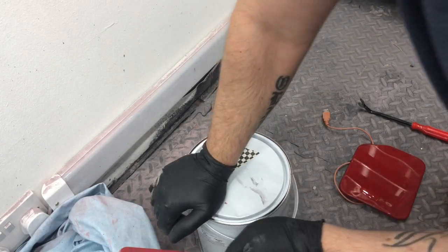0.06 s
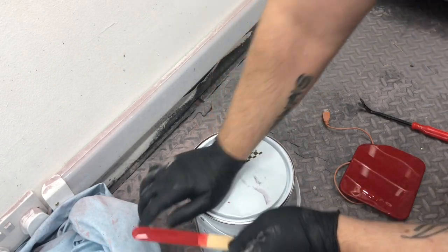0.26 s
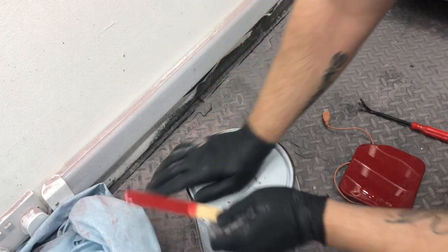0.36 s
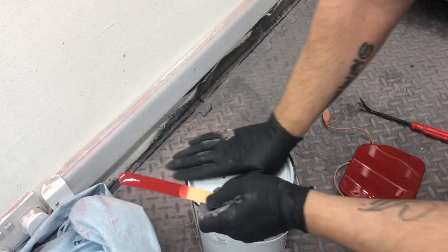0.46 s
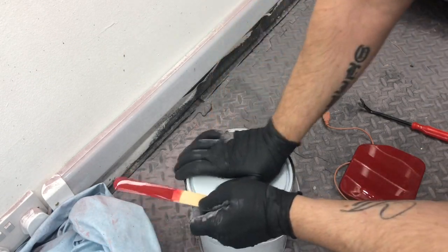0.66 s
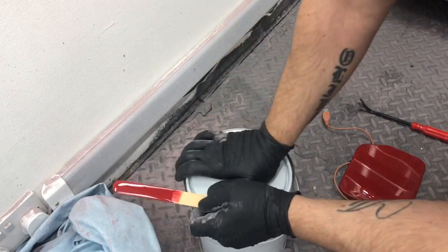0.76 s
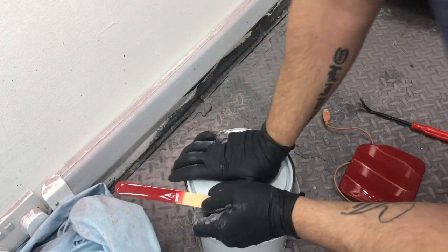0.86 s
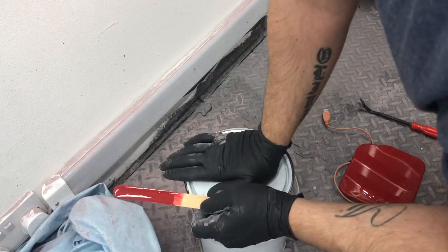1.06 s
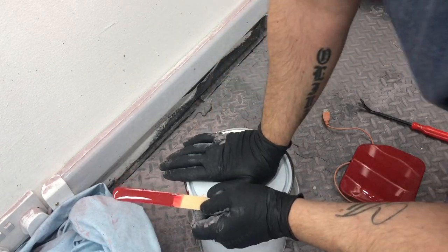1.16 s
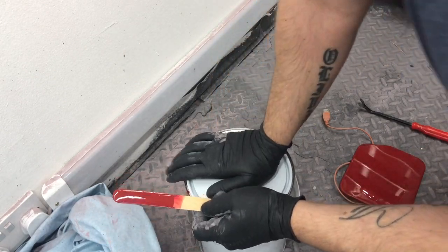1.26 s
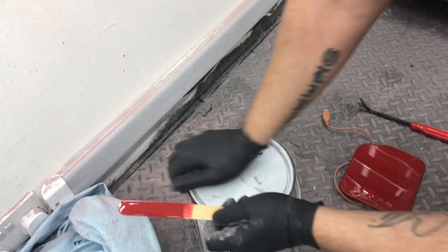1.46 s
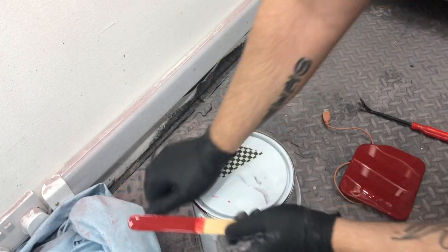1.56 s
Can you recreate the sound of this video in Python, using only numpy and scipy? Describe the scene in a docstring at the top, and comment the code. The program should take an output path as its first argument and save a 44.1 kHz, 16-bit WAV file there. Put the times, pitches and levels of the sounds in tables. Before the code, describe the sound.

Metal paint tin lid struck shut by hand, hollow clank, rubbing and bright seam clicks in a garage

```python
"""A gloved hand knocks the lid of a paint tin down in a garage: one hard blow, two soft pushes, a last firm knock.
Each blow excites damped modes of the tin, a bending wave of falling pitch and a rattle of the sheet.
The seam snaps as noise bursts over hollow pops, and light taps ring as the lid shifts under the glove.
The sliding glove is shaped noise with a rim resonance and a drone; faint squeaks are gliding sines.
Shaped noise and one faint tone fill the room; decaying noise gives the echoes."""
import sys
import numpy as np
from scipy import signal
from scipy.fft import rfft, irfft
from scipy.io import wavfile

SR = 44100
rng = np.random.default_rng(int(sys.argv[2]) if len(sys.argv) > 2 else 0)


def persist_wave(psi):
    """Save psi, clipped to +-1, as 16-bit WAV."""
    counts = np.round(np.clip(psi, -1, 1) * 32767).astype(np.int16)
    wavfile.write(sys.argv[1], SR, np.atleast_2d(counts).T)


def gain_from_db(level_db):
    """Turn a decibel level (scalar or array-like) into a linear amplitude factor."""
    decades = np.asarray(level_db, float) / 20
    return 10 ** decades


N = 72765  # length [samples]


def in_time(rows):
    """Linear interpolation: turns each column after the time into a curve over the scene."""
    s, *columns = np.transpose(rows)
    return [np.interp(np.arange(N) / SR, s, column) for column in columns]


def at_hz(points, hz):
    """Interpolation on a logarithmic frequency axis."""
    table_hz, values = np.array(points).T[:2]
    return np.interp(np.log(hz), np.log(table_hz), values)


def rms_one(x):
    """Normalisation to unit effective value."""
    return x / np.sqrt(np.mean(x ** 2) + 1e-20)


def coloured(spectrum):
    """Spectral shaping: white noise weighted by a spectrum, rms 1."""
    hz = np.maximum(np.arange(N // 2 + 1) * SR / N, 1)
    white = rng.standard_normal(N)
    return rms_one(irfft(rfft(white) * gain_from_db(at_hz(spectrum, hz)), N))


def decay(t, t60, level_db=0):
    """Exponential damping: the level falls by 60 dB in each t60 [s]."""
    return gain_from_db(level_db - 60 * t / t60)


def ring(hz, t60, length):
    """Damped resonance: a sine that builds up over about a cycle, so low modes swell later."""
    build_cycles = 0.24  # time constant
    t = np.arange(length) / SR
    return np.sin(2 * np.pi * hz * t) * decay(t, t60) * (1 - np.exp(-t * hz / build_cycles))


def phase(hz):
    """Instantaneous phase [rad]: the running integral of frequency."""
    return 2 * np.pi * np.cumsum(hz) / SR


def soften(x, cut_hz):
    """Contact compliance: a soft contact acts as a second-order low-pass."""
    return signal.sosfilt(signal.butter(2, min(cut_hz, .45 * SR), fs=SR, output="sos"), x)


def add(out, s, sound):
    """Superposition: mixes a sound in at a time [s]."""
    i = int(s * SR)
    out[i:i + len(sound)] += sound[:N - i]


# background noise of the room: (frequency [Hz], relative level [dB per Hz])
ROOM_SPECTRUM = [(20, -57), (30, -47), (42, -6), (60, 1), (90, -7.5), (370, -16.5), (680, -18), (940, -14),
                 (1500, -20), (2350, -28.5), (3430, -33), (7900, -44), (16000, -55)]
# faint tone that swells, then sinks to a steady level: (time [s], frequency [Hz], peak level [dB])
FAINT_TONE = [(1.1, 375, -87), (1.14, 368.3, -56.5), (1.23, 374, -57.5), (1.28, 359, -64)]


def room_tone():
    """Stationary broadband noise plus one frequency-modulated sine."""
    hz, db = in_time(FAINT_TONE)
    noise = gain_from_db(-52) * coloured(ROOM_SPECTRUM)
    return noise + gain_from_db(db) * np.sin(phase(hz))


# glove sliding over the lid: (time [s], rms level [dB])
SLIDE_LEVEL = [(0, -79), (.26, -71.5), (.285, -53), (.34, -74), (.41, -77), (.42, -59.5), (.47, -58),
               (.5, -60), (.58, -60), (.63, -55.5), (.72, -52.5), (.78, -58), (.86, -60.5), (.92, -68.5),
               (1.2, -68.5), (1.4, -63.5), (1.43, -59), (1.48, -55.5), (1.505, -69), (1.65, -65.5)]
# colour of the glove's rustle: (frequency [Hz], relative level [dB per Hz])
RUSTLE_SPECTRUM = [(1470, -10), (2500, -4), (3490, -4.5), (3860, -3), (5830, -7), (6550, -8.5),
                   (15000, -10.5), (16000, -9.5)]
# the rim singing while it is rubbed: (time [s], rms level [dB], centre frequency [Hz])
RIM_SONG = [(0, -99, 3900), (.412, -85, 3900), (.42, -57.5, 3900), (.447, -54.5, 3900), (.455, -69, 4700),
            (.467, -56, 4750), (.478, -68, 4680), (.505, -69, 4427), (.515, -69, 4480), (.565, -63, 4390),
            (.575, -76, 4060), (.585, -52, 3966), (.65, -67, 3830), (.72, -76, 3706), (1.52, -71.5, 3813),
            (1.57, -65, 4140), (1.65, -67, 3870)]
# the lid body droning under the same rubbing: (time [s], rms level [dB])
DRAG_LEVEL = [(0, -90), (.4, -101), (.43, -47), (.47, -53), (.5, -62), (.56, -54.5), (.575, -41.5),
              (.62, -52), (.7, -58.5), (.8, -58.5), (1.65, -62)]
# colour of the drone: (frequency [Hz], relative level [dB per Hz])
DRAG_SPECTRUM = [(120, -10), (200, 0), (352, 3), (524, -29), (594, -15), (753, -4.5), (1130, -12),
                 (1540, -2.5), (3000, -18), (3900, -42), (6600, -120)]


def rubbing():
    """Friction noise: smooth rustle, with a wandering rim resonance and a lid drone in common grain."""
    slide_db, = in_time(SLIDE_LEVEL)
    rim_db, rim_hz = in_time(RIM_SONG)
    drag_db, = in_time(DRAG_LEVEL)
    grain = gain_from_db(2.8 * rms_one(soften(rng.standard_normal(N), 120)))  # 2.8 dB rms, up to about 120 Hz
    rim_width_hz = 430  # before the grain
    wobble = rms_one(soften(rng.standard_normal(N), rim_width_hz / 2))
    band = wobble * np.sqrt(2) * np.sin(phase(rim_hz))
    rustle = gain_from_db(slide_db) * coloured(RUSTLE_SPECTRUM)
    rim = gain_from_db(rim_db) * rms_one(grain * band)
    drone = gain_from_db(drag_db) * rms_one(grain * coloured(DRAG_SPECTRUM))
    return rustle + rim + drone


# blows of the hand: (time [s], level [dB], contact cut-off of each of two low-passes [Hz],
# spot on the lid [whole part: 0, 1 or 2])
HAND_BLOWS = [(0.2194, -16, 5000, 0), (.822, -51, 500, 0), (0.8529, -34, 1490, 1),
              (1.3865, -23.5, 2100, 2.047)]
# modes of the tin: (frequency [Hz])
MODE_HZ = [118, 176, 245, 267, 315, 420, 535, 590, 633, 695, 772, 902, 1020, 1060, 1126, 1192, 1270, 1392,
           1642, 1867, 2205, 2754]
# for each mode: (t60 before the spot's share [s], relative level when struck at spot 0, 1, 2 [dB])
MODES = [(0.15, -11, 10, -7), (.1, 0.5, 18, 4), (0.13, -0.5, -5, 2.5), (0.3, -3, -7, -32),
         (0.17, -8, 6.5, -9), (0.22, -8.5, -3, 6.5), (.11, 7.5, 2, 0), (0.067, -16, 2, -10),
         (0.19, 1, -5, -6.5), (0.098, 3, -7, 7.5), (0.14, -0.5, -4, -6.5), (0.13, -23, -16, -27),
         (0.19, -3, -27, -8), (0.1, 1, -28, -11), (0.13, -4, -34, -7), (.09, -13, -34, -32),
         (0.17, -3, -34, -32), (0.18, -12, -30, -28), (0.058, -20, -35, -15), (0.1, -5.5, -40, -33),
         (0.069, -5.5, -37, -21), (.06, -15.5, -48, -29)]
# by spot: (wave level [dB], wave's initial frequency above its end [Hz], wave t60 [s],
# share of the modes' t60 [ratio], rattle level [dB])
STRUCK_SPOTS = [(8.5, 1074, 0.035, 0.66, 3), (7.5, 705, 0.15, 0.43, -15), (8, 812, 0.022, 0.53, -5)]
# rattle of the loose sheet during a blow: (frequency [Hz], relative level [dB per Hz])
CLATTER_SPECTRUM = [(500, -55), (900, 0), (1300, 1.5), (1700, -18.5), (2730, -9.5), (4300, -20),
                    (5300, -22.5), (8900, -52), (15000, -55)]
# shiver of the sheet after it: (frequency [Hz], relative level [dB per Hz])
SHIVER_SPECTRUM = [(200, -45), (350, -15.5), (600, -6.5), (1000, -5.5), (1400, -9.5), (1900, -17.5),
                   (2600, -26.5), (3500, -32), (5000, -68), (7000, -65)]


def bending_wave(t, spot):
    """Dispersion: the bending wave running out from the palm brings highs first, lows later."""
    wave_db, start_hz, wave_t60, _, _ = STRUCK_SPOTS[spot]
    end_hz, fall_s, rise_s = 104.3, .006, 0.0005
    hz = end_hz + start_hz / (1 + t / fall_s) ** 2
    return np.sin(phase(hz)) * decay(t, wave_t60, wave_db) * (1 - np.exp(-t / rise_s)) ** 2


def tin_modes(length, spot):
    """Modal superposition: the spot struck sets the level of every mode and scales its decay time."""
    ring_share = STRUCK_SPOTS[spot][3]
    body = np.zeros(length)
    for hz, (t60, *levels) in zip(MODE_HZ, MODES):
        body += gain_from_db(levels[spot]) * ring(hz, t60 * ring_share, length)
    return body


def sheet_rattle(t, spot):
    """Chattering contact: noise of the loose sheet dies fast and a shiver lingers."""
    clatter = coloured(CLATTER_SPECTRUM)[:len(t)] * decay(t, 0.063)
    shiver = coloured(SHIVER_SPECTRUM)[:len(t)] * decay(t, 0.16, -2)
    rise_s = 0.00083
    return gain_from_db(STRUCK_SPOTS[spot][4]) * (clatter + shiver) * (1 - np.exp(-t / rise_s)) ** 2


def blows():
    """Impact excitation: each blow starts wave, modes and rattle; a small tin radiates little bass."""
    out, length = np.zeros(N), SR // 3
    t = np.arange(length) / SR
    for s, db, cut_hz, spot in HAND_BLOWS:
        spot = int(spot)
        # the modes start in opposite phase to the wave
        strike = sheet_rattle(t, spot) + bending_wave(t, spot) - tin_modes(length, spot)
        add(out, s, gain_from_db(db) * soften(soften(strike, cut_hz), cut_hz))
    radiates_above_hz = 95
    return signal.sosfilt(signal.butter(4, radiates_above_hz, "high", fs=SR, output="sos"), out)


# snaps of the seam: (time [s], level [dB], burst t60 [s], level of the hollow pop under it [dB],
# low-pass of burst and sizzle [Hz])
SEAM_SNAPS = [(0.221, -37.5, 0.028, -30, 16100), (0.9283, -17.5, 0.0086, -40, 19000),
              (.9415, -27, 0.0068, -27, 12000), (.9732, -13, 0.0091, -35, 18000),
              (.983, -24.5, 0.018, -18.5, 13700), (1.0412, 2.5, 0.01, -14.5, 11000),
              (1.1562, -22.5, 0.011, -40, 5650), (1.382, -24.5, .012, -37, 18000)]
# colour of the burst: (frequency [Hz], relative level [dB per Hz])
SNAP_SPECTRUM = [(900, -40), (1500, 0), (2300, -3.5), (3000, -2.5), (4000, 0), (5000, -6.5), (7500, 0),
                 (10000, -5.5), (14500, -12.5), (16000, 0.5)]
# colour of the rim's sizzle: (frequency [Hz], relative level [dB per Hz])
SIZZLE_SPECTRUM = [(530, -8), (900, -10), (1170, -9.5), (1490, -2.5), (1620, -8), (2690, -20.5),
                   (2890, -25), (7490, -15.5), (16000, -32)]
# resonances of the hollow pop: (frequency [Hz], t60 [s], relative level [dB])
POP_MODES = [(146, 0.11, -22.5), (324, 0.015, -6), (538, 0.017, -4), (900, 0.022, 1.5), (1100, 0.016, 2.5),
             (1436, 0.21, -26), (1570, 0.26, -40), (2257, 0.017, -3.5)]


def snaps():
    """Sudden release: a quick bright burst over a resonant pop, after which the rim sizzles on."""
    out, length = np.zeros(N), SR // 4
    t = np.arange(length) / SR
    rise_s = 0.0018
    rise = (1 - np.exp(-t / rise_s)) ** 3
    for s, db, burst_t60, pop_db, top_hz in SEAM_SNAPS:
        burst = coloured(SNAP_SPECTRUM)[:length] * decay(t, burst_t60)
        sizzle = coloured(SIZZLE_SPECTRUM)[:length] * decay(t, 0.16, -35.5)
        pop = np.zeros(length)
        for k, (hz, t60, level) in enumerate(POP_MODES):
            pop += (-1) ** k * gain_from_db(pop_db + level) * ring(hz, t60, length)  # alternating sign
        add(out, s, gain_from_db(db) * rise * (soften(burst + sizzle, top_hz) + pop))
    return out


# reverberation of the garage: (frequency [Hz], t60 [s])
GARAGE_T60 = [(100, 0.52), (300, 0.45), (1000, 0.32), (3000, 0.33), (8000, 0.28), (15000, .2)]


def garage(x):
    """Diffuse reverberation: convolution with dense noise whose decay time depends on the band."""
    t = np.arange(SR // 2) / SR
    tail = np.zeros(len(t))
    white = rng.standard_normal((2, len(t)))  # neighbouring bands take different noises
    edges_hz = 25 * 2 ** (.4 * np.arange(4, 24))
    for k, (low, high) in enumerate(zip(edges_hz, edges_hz[1:])):
        band_pass = signal.butter(2, [low, high], "band", fs=SR, output="sos")
        band = signal.sosfilt(band_pass, white[k % 2])
        tail += band * decay(t, at_hz(GARAGE_T60, np.sqrt(low * high)))
    build_s = .02
    tail = tail * np.clip(t / build_s, 0, 1) ** 2
    unit_energy = tail / np.sqrt(np.sum(tail ** 2))
    return signal.fftconvolve(x, gain_from_db(-19) * unit_energy)[:N]


# light taps as the lid shifts under the glove: (time [s], level [dB], nominal pitch [Hz])
LID_TAPS = [(0.418, -39.5, 1280), (0.426, -39.5, 324), (0.4389, -36, 1054), (0.45, -37.5, 1175),
            (.463, -48, 900), (0.467, -39, 349), (0.514, -41, 1410), (.543, -35, 1080),
            (0.568, -30.5, 1520), (0.569, -40, 415), (.578, -49, 1660), (0.607, -41, 780),
            (0.982, -48, 260), (1.1563, -34.5, 2370)]


def taps():
    """Inharmonic partials: each tap rings near its pitch, with weaker partials above and below."""
    out = np.zeros(N)
    t60_cycles = 20.6  # cycles of the nominal pitch
    partials = [(0.966, 1.5), (1.65, -10), (0.46, -26)]  # (frequency ratio, relative level [dB])
    for s, db, hz in LID_TAPS:
        for ratio, level in partials:
            add(out, s, gain_from_db(db + level) * ring(hz * ratio, t60_cycles / hz, SR // 10))
    return out


# thin high squeaks, one table each: (time [s], frequency [Hz], rms level [dB])
SQUEAK_GLIDES = [
    [(1.22, 12300, -72), (1.232, 12000, -68), (1.258, 12300, -84), (1.285, 13100, -70), (1.302, 13600, -77),
     (1.33, 12800, -78)],
    [(1.335, 12500, -72), (1.35, 12700, -66), (1.367, 12600, -70), (1.385, 11500, -65), (1.405, 11800, -73),
     (1.417, 11450, -62)],
    [(1.548, 11750, -72), (1.565, 12400, -69), (1.6, 12680, -71), (1.616, 12600, -66), (1.638, 11560, -75),
     (1.65, 11800, -71)],
]
# companions of each squeak: (frequency ratio, relative level [dB])
COMPANIONS = [(1.14, -9), (.89, -11)]


def squeaks():
    """Frequency modulation: gliding sines with weaker companions above and below."""
    out, t = np.zeros(N), np.arange(N) / SR
    for rows in SQUEAK_GLIDES:
        hz, db = in_time(rows)
        inside_s = np.minimum(t - rows[0][0], rows[-1][0] - t)
        gate = np.clip(inside_s / .004 + 1, 0, 1)  # 4 ms fades outside the table's ends
        turn = phase(hz)
        voice = np.sin(turn)
        for ratio, level in COMPANIONS:
            voice += gain_from_db(level) * np.sin(ratio * turn)
        out += np.sqrt(2) * gate * gain_from_db(db) * voice
    return out


def scene():
    """Superposition: the struck tin with its echoes, the rubbing and squeaks, and the room tone."""
    tin = blows() + snaps() + taps()
    mix = room_tone() + rubbing() + tin + garage(tin) + squeaks()
    return mix[None]  # one channel


def roll_off(x):
    """The treble ends steeply here."""
    return signal.sosfilt(signal.butter(12, 16620, fs=SR, output="sos"), x)


def record(dry):
    """Band limitation: a steep low-pass takes the top off, 30 dB down from 16274 Hz."""
    top_cut = signal.cheby2(10, 30, 16274, fs=SR, output="sos")
    mix = signal.sosfilt(top_cut, dry)
    return roll_off(mix)


dry = scene()
out = record(dry)
persist_wave(out)
```